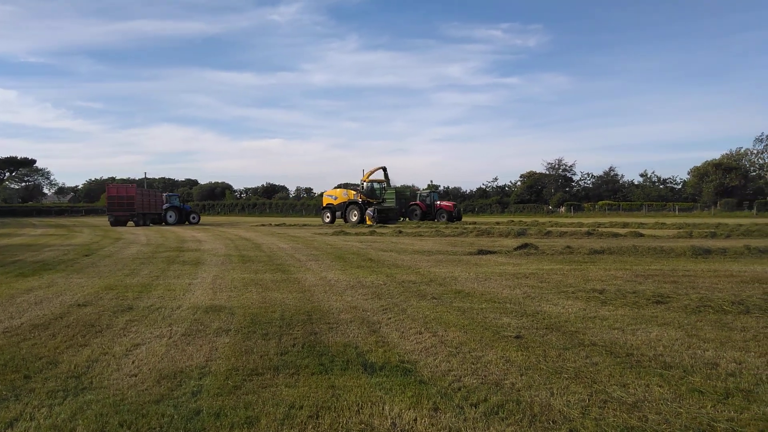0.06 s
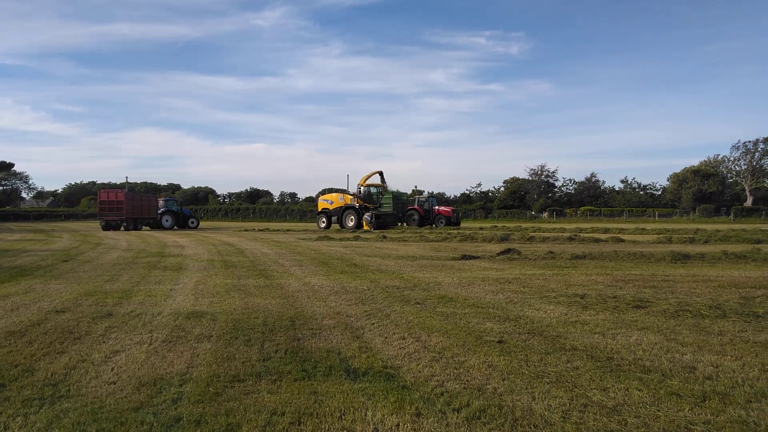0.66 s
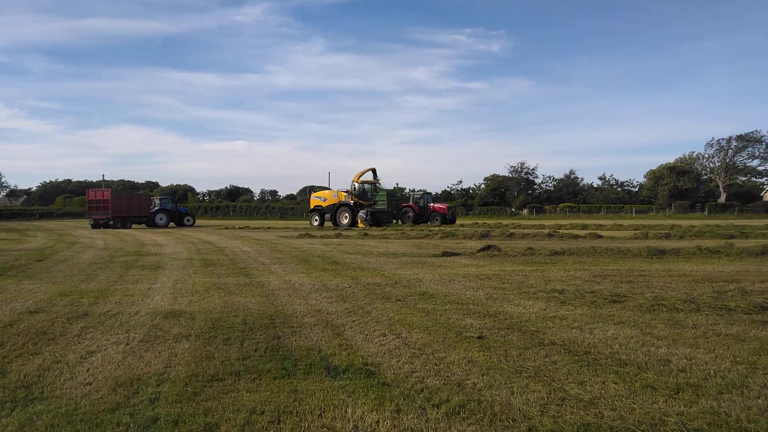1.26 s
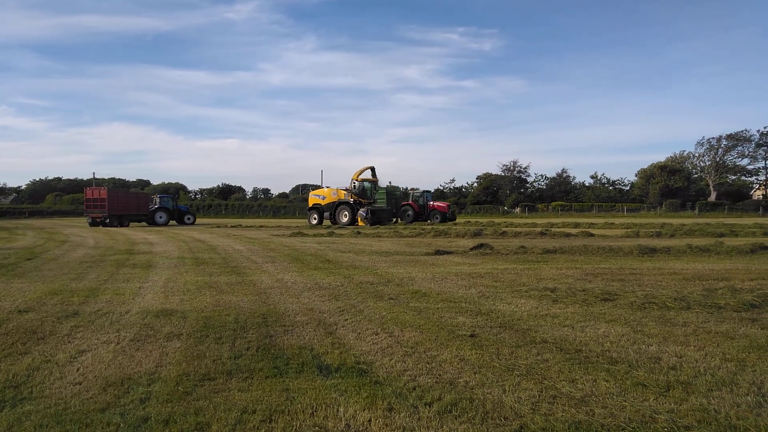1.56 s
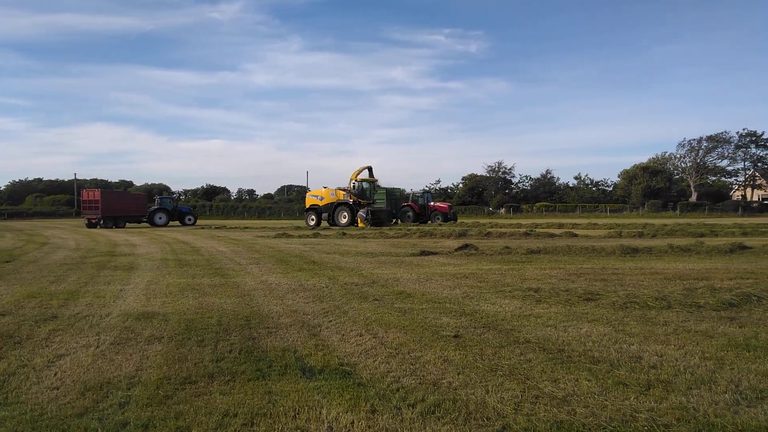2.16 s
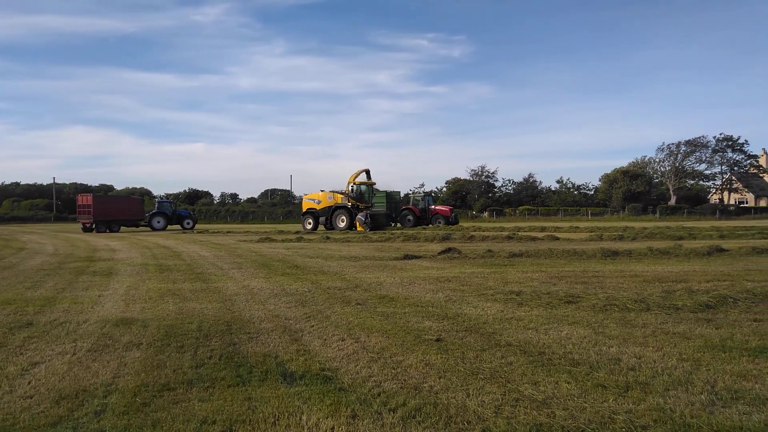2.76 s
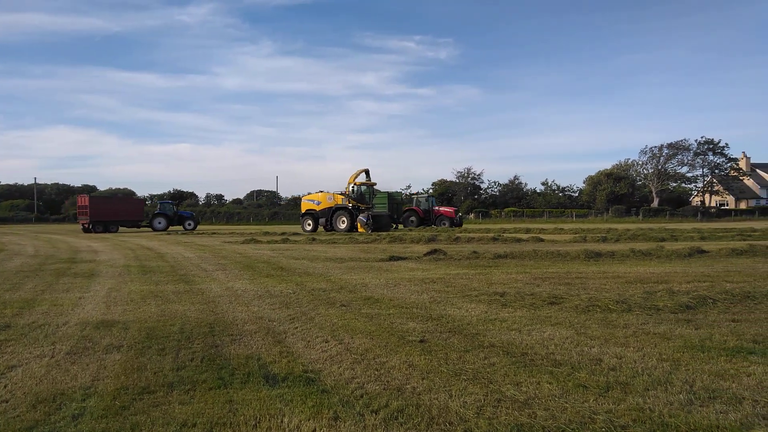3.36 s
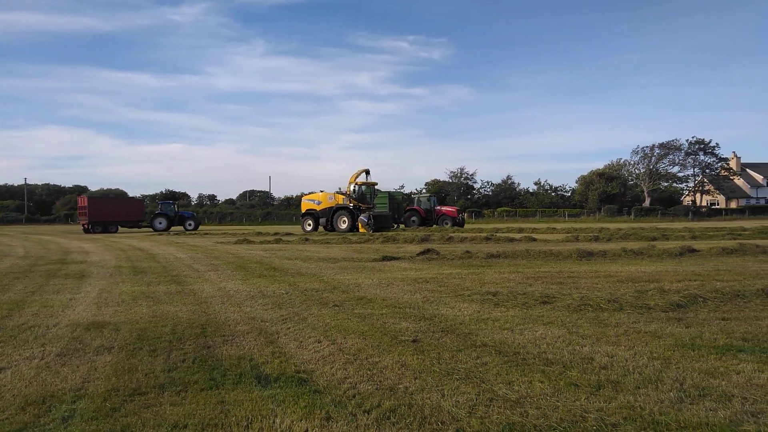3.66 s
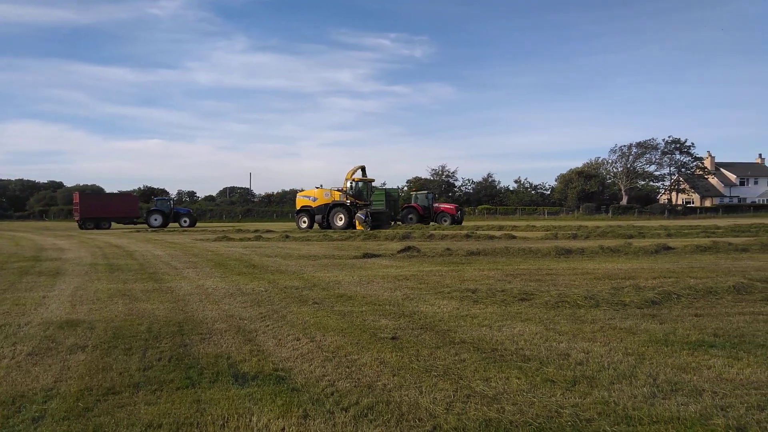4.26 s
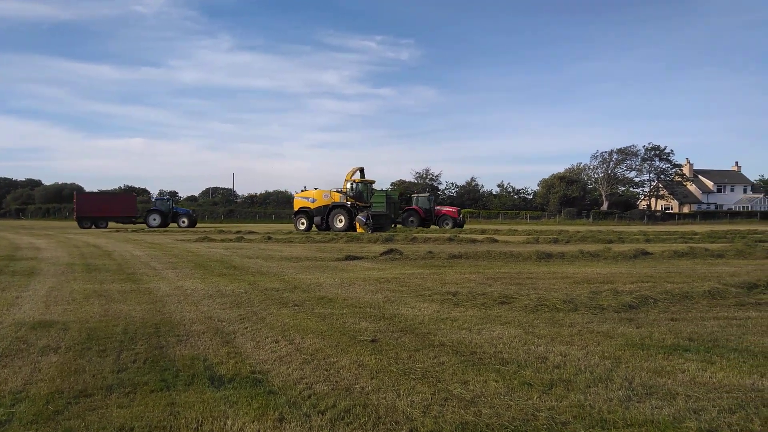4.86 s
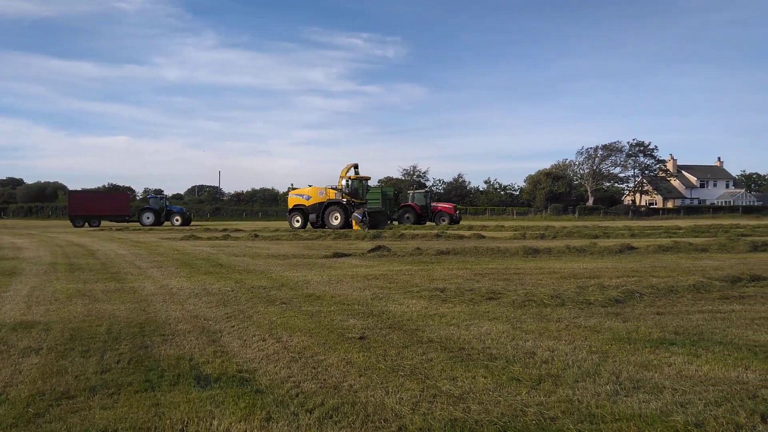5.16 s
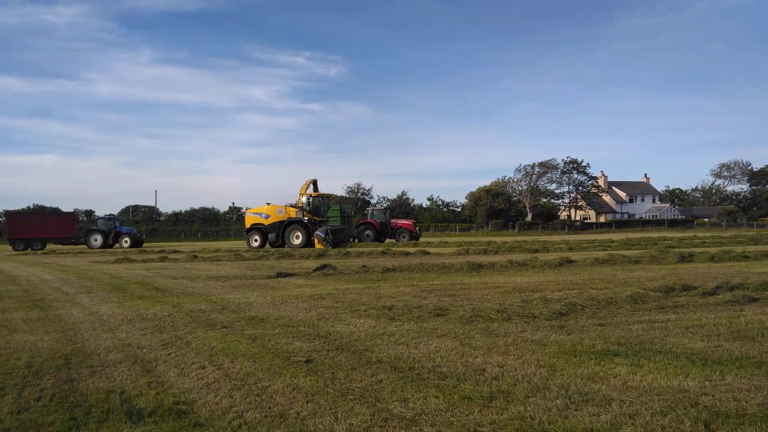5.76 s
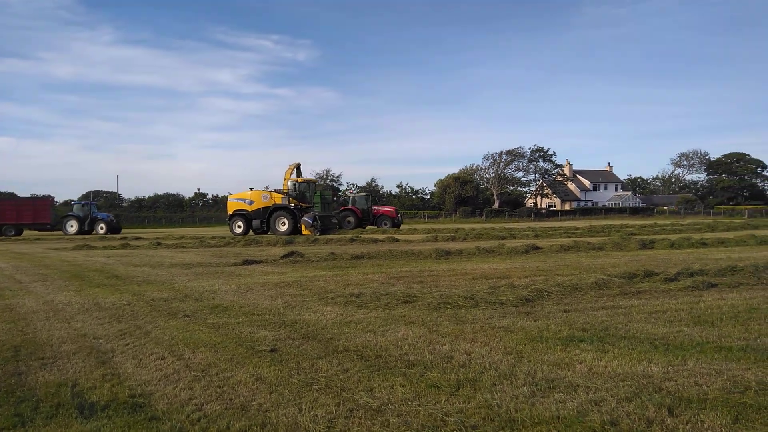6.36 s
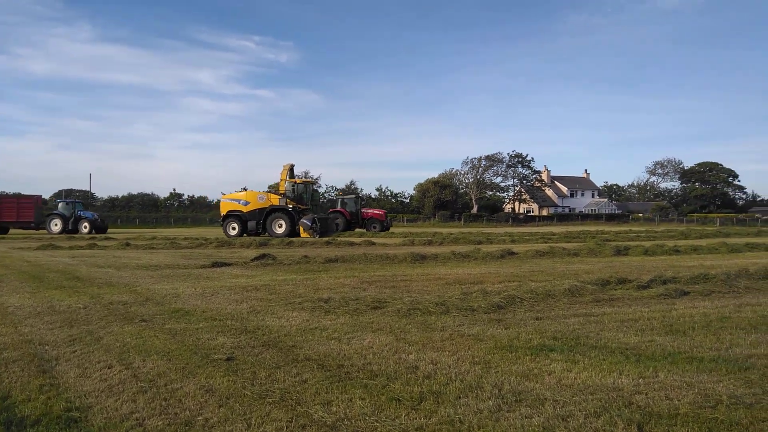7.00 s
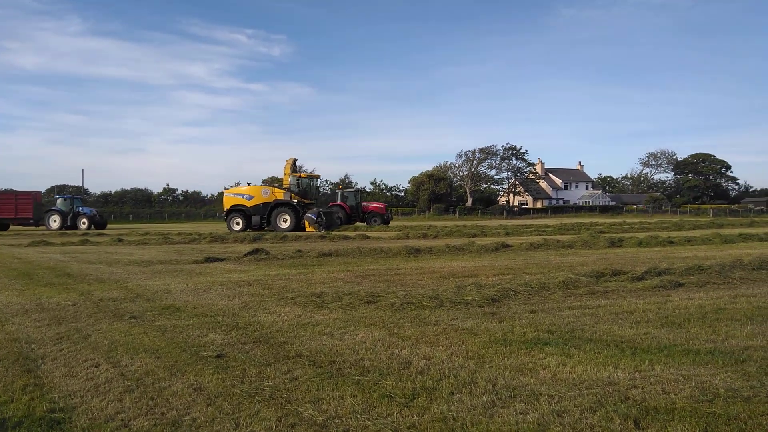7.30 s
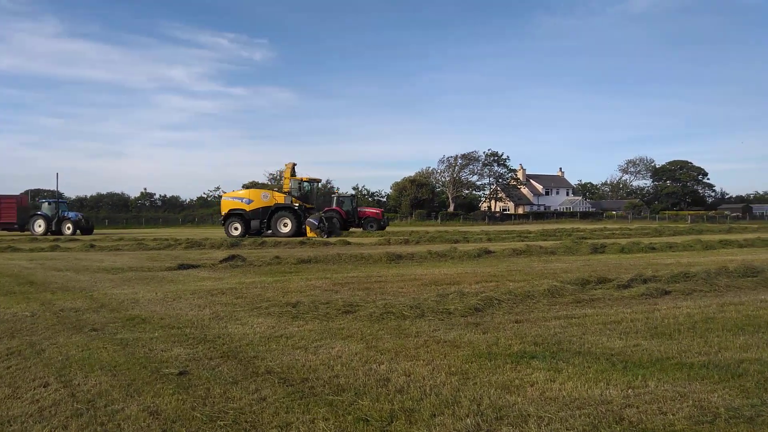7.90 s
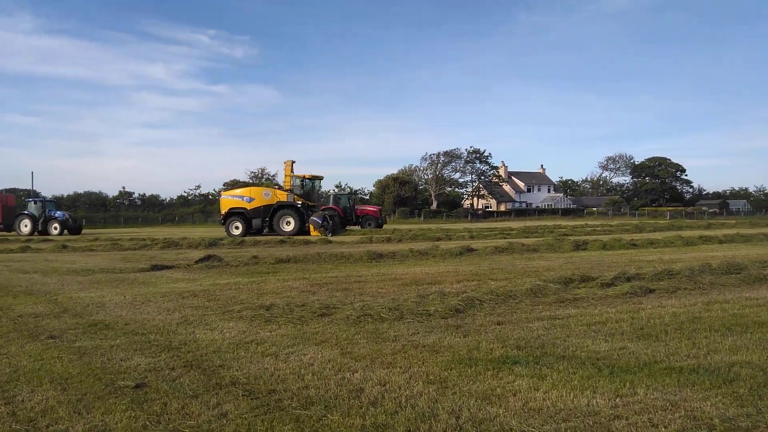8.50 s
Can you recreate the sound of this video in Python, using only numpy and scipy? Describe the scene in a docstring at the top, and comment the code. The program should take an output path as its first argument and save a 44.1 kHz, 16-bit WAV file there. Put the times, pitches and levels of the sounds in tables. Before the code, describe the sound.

Heard from a distance outdoors, a harvester's diesel engine and cutter drum hum continuously beneath a fluttering rush and hiss of chopped grass. The pitch dips briefly with each thick swath, while a thin metallic whine and a faint high whistle waver on top. Two tractor engines add a low drone that builds gently through the first half. Later the stereo image shifts a little as the microphone swings, and the machines carry on.

```python
"""A forage harvester chops grass some sixty metres off across an open field, two tractors alongside.
Its diesel sags under each thick swath; exhaust note, cutter drum and gears are orders of one shaft and
sag together, while the turbocharger whistles. Chopped crop roars and hisses through the spout, and the
tractors drone below. Scattering in turbulent air makes every tone fade and swell. Partway through,
the microphone swings, so that the harvester is heard from one side."""
import sys
import numpy as np
from scipy import signal
from scipy.fft import rfft, irfft
from scipy.io import wavfile

SR = 44100
rng = np.random.default_rng(int(sys.argv[2]) if len(sys.argv) > 2 else 0)


def int16_out(signal):
    """Quantize to a 16-bit WAV file."""
    q = np.round(np.clip(np.atleast_2d(signal).T, -1, 1) * 32767)
    wavfile.write(sys.argv[1], SR, q.astype(np.int16))


N = 381024
TIME, FREQ = np.arange(N) / SR, np.maximum(np.fft.rfftfreq(N, 1 / SR), 1)

# Response of the two microphone ports, with the harvester ahead and to one side:
# (frequency [Hz], left minus right level [dB], coherence [0-1], left phase lag [rad])
PORTS_AHEAD = [(250, 0, 1, 0), (650, .3, .99, .1), (1350, .9, .94, .15), (1650, 1, .65, .4),
               (1950, 0, .9, .1), (2500, 2.5, .8, .25), (2750, 2, .63, .25), (2930, 9, .06, 1.2),
               (3170, 0, .95, 3.14), (3500, .5, .94, 3.1), (3800, -3, .26, 1.7), (4110, -.5, .85, 3),
               (4410, -1, .55, .2), (4590, 0, .64, 2.6), (4750, .6, .7, .8), (5200, -2, .45, 1.7),
               (6650, 2.4, .65, 2.05), (7900, 0, .55, 2.8), (9150, -11, .18, .4), (10300, -2, .7, 2.85),
               (10950, -4.2, .58, 2.85), (12650, 1.5, .8, 3.1), (13700, -1, .1, 3.1)]
PORTS_ASIDE = [(250, 0.0, 1.0, 0.0), (650, 1.0, 0.99, 0.2), (1350, 3.0, 0.91, 0.9), (1700, -2.0, 0.7, 0.6),
               (2050, 1.0, 0.74, 1.4), (2250, -1.5, 0.62, 1.1), (2890, 5.6, 0.54, 1.99),
               (3150, -0.6, 0.998, 3.16), (3400, 0.8, 0.998, 3.12), (3870, -6.9, 0.03, -0.65),
               (4340, -0.3, 0.33, 0.57), (4600, 3.5, 0.55, 2.53), (4950, 0.7, 0.75, 2.62),
               (5260, 0.5, 0.88, 3.73), (6680, 2.0, 0.33, 4.63), (7580, -0.0, 0.78, 6.15),
               (8770, -9.0, 0.0, 5.87), (10170, 0.1, 0.75, 6.32), (10440, -0.8, 0.14, 7.58),
               (11460, -2.8, 0.33, 7.7), (12590, -0.9, 0.84, 9.29), (13260, 0.1, 0.12, 8.92)]


def undb(db):
    """Amplitude ratio of a level in decibels."""
    return np.exp(np.asarray(db) * (np.log(10) / 20))

def curve(table):
    """Linear interpolation in time: each later column of a table at every sample."""
    times, *columns = np.transpose(table)
    return [np.interp(TIME, times, c) for c in columns]

def colour(table):
    """Interpolation in log frequency: each later column of a table at every spectral bin."""
    hz, *columns = np.transpose(table)
    return [np.interp(np.log(FREQ), np.log(hz), c) for c in columns]

def ramp(middle_s, length_s):
    """Linear transition from 0 to 1, centred on middle_s."""
    return np.clip((TIME - middle_s) / length_s + 1 / 2, 0, 1)

def bump(middle_s, width_s):
    """Gaussian pulse of height 1 that falls to 1/e at width_s from its middle."""
    return np.exp(-((TIME - middle_s) / width_s) ** 2)

def noise():
    """Spectrum of white noise with a density of 0 dB per Hz."""
    return rfft(rng.standard_normal(N)) * np.sqrt(SR / 2)

def wander(rate, size=2048):
    """Band-limited random fluctuation of unit variance, changing about rate times a second."""
    hz = np.arange(size // 2 + 1) * SR / N
    slow = irfft(rfft(rng.standard_normal(size)) * hz / (hz + .2 * rate) / (1 + (hz / rate) ** 2))
    return np.interp(np.arange(N), np.linspace(0, N, size), slow / slow.std())

def phase_of(hz):
    """Phase is the time integral of frequency."""
    return 2 * np.pi * np.cumsum(hz) / SR

def tone(phase, scatter, rate):
    """Scattering: turbulent air gives a tone of rms 1 a part of wandering amplitude and phase."""
    phase = phase + 2 * np.pi * rng.random()
    in_phase, quadrature = 1 + scatter * wander(rate), scatter * wander(rate)
    return (in_phase * np.cos(phase) + quadrature * np.sin(phase)) * np.sqrt(2 / (1 + 2 * scatter ** 2))

def ports(table, direct, diffuse=None):
    """Left and right spectra differ in level and phase; diffuse sound lowers their coherence."""
    pan_db, coherence, lag = colour(table)
    pair = np.array([direct, direct])
    if diffuse is not None:
        opposed = np.array([diffuse, -diffuse])
        pair = pair * np.sqrt((1 + coherence) / 2) + opposed * np.sqrt((1 - coherence) / 2)
    balance = undb(np.array([pan_db, -pan_db]) / 2)
    balance /= np.sqrt(np.mean(balance ** 2, axis=0))
    return pair * balance * np.array([np.exp(-1j * lag), np.ones(len(lag))])

def microphone_swing():
    """Direction of incidence: 0 with the harvester ahead, 1 with it to one side."""
    return ramp(middle_s=5.4, length_s=.26)

def tractors():
    """Spherical spreading: two diesels of wandering speed grow louder as they draw closer."""
    # engine tones: (frequency [Hz], relative level [dB])
    partials = [(105, -46), (121, -38.5), (136, -27.5), (143, -36), (243, -41.5)]
    # exhaust grumble and midrange growl: (frequency [Hz], relative spectral density [dB])
    grumble_spectrum = [(40, -90), (75, -56.5), (100, -55.5), (135, -48), (165, -50.5), (200, -59.5),
                        (290, -60.5), (350, -74), (500, -130)]
    growl_spectrum = [(280, -100), (400, -76.5), (560, -66), (680, -63), (790, -67), (1000, -75),
                      (1400, -100)]
    drift = 1 + .01147 * wander(.578)
    drone = sum(undb(db - 5.5) * tone(phase_of(hz * drift), scatter=.65, rate=4.8) for hz, db in partials)
    grumble = irfft(noise() * undb(colour(grumble_spectrum)[0]))
    growl = irfft(noise() * undb(colour(growl_spectrum)[0]))
    growl *= ramp(middle_s=3.4, length_s=.33) * undb(1.5 * wander(4.9))  # enters as they draw level
    approach_db = np.interp(TIME, [0, 4.9], [-5.5, 1])
    return undb(approach_db) * (drone + grumble + growl)

def rumble(fade_db_per_s=.3):
    """Directivity: the noise of tyres, feed rollers and exhaust gas fades as the rear turns away."""
    # the harvester's low noise: (frequency [Hz], spectral density [dB per Hz])
    spectrum = [(15, -71), (30, -72), (50, -68), (70, -59), (95, -58.5), (130, -56.5), (165, -51),
                (195, -56), (255, -57), (305, -59), (340, -69), (400, -90), (600, -127)]
    fade_db = fade_db_per_s * (TIME - TIME.mean())
    return irfft(noise() * undb(colour(spectrum)[0])) * undb(.57 * wander(4.5) - fade_db)

def crop_stream(firing, bands=9, hiss_from_hz=3500):
    """Flow noise: the blower roars and grass hisses up the spout; moving air flutters each band."""
    # rush of the crop: (frequency [Hz], relative spectral density ahead [dB], the same aside [dB])
    rush_spectra = [(400, -75, -67), (530, -65.5, -61.5), (700, -60, -58), (825, -64, -63.5),
                    (940, -64, -63.5), (1150, -60.5, -58.5), (1390, -59.5, -58), (1600, -64, -62),
                    (1860, -58.5, -57.5), (2000, -60.5, -57), (2120, -62.5, -59), (2380, -60.5, -58.5),
                    (2590, -63.9, -61.5), (2980, -68.5, -65.3), (3250, -72.5, -75.5), (3390, -72, -75.5),
                    (3830, -66, -67.5), (4070, -72.5, -66.5), (4800, -67, -64.5), (4760, -63.5, -62.5),
                    (6130, -57, -55.5), (6750, -60, -56.5), (7660, -62.5, -57.5), (8100, -62.5, -60),
                    (8700, -63, -66.5), (9470, -61, -63), (10400, -65.5, -66), (11300, -63.5, -64.5),
                    (12320, -70.5, -64), (13600, -80.5, -83)]
    # hiss following the flow of grass: (time [s], relative level [dB])
    flow_level = [(0, 0.2), (.5, 0), (1, -2), (1.25, -2.4), (1.65, -1.4), (2.25, -1.3), (2.5, -0.5),
                  (2.95, -0.5), (3.4, -1.4), (3.75, -0.7), (4.4, 1), (4.9, 0.2), (5.25, -0.9), (5.55, -2.4),
                  (6.4, .5), (7.5, -0.25), (8.64, .2)]
    centres_hz = np.geomspace(400, 4500, bands)
    band_position = np.interp(np.log(FREQ), np.log(centres_hz), np.arange(bands))
    low_cut = 1 / np.sqrt(1 + (370 / FREQ) ** 12)
    throb = 1 + .04 * np.cos(firing)
    roar = undb(-.7 + 1.1 * bump(5.75, 1.7)) * throb  # swells as the spout points at the listener
    hiss = undb(curve(flow_level)[0])
    flutter = [undb(wander(9.2) + 1.6 * wander(17)) for _ in centres_hz[:-1]]
    flutter.append(undb(.28 * wander(8)))  # the top band wavers only slightly
    swing = microphone_swing()
    out = 0
    for table, rush_db, share in zip((PORTS_AHEAD, PORTS_ASIDE), colour(rush_spectra), (1 - swing, swing)):
        pair = ports(table, noise(), noise()) * undb(rush_db) * low_cut
        for k, hz in enumerate(centres_hz):
            gain = roar if hz < hiss_from_hz else hiss
            band = irfft(pair * np.maximum(1 - abs(band_position - k), 0))
            out = out + band * (flutter[k] * gain * np.sqrt(share))
    return out

def sheen(stream, above_hz=10500):
    """Amplitude modulation: the highest hiss wavers, dulls early on and brightens briefly near 5.5 s."""
    # treble shelf: (time [s], gain [dB])
    shelf = [(0, -1.2), (.55, .8), (1.15, -4), (1.9, -5), (2.3, -1.1), (3.6, .2), (4.5, 1.3), (5.2, -0.5),
             (5.48, 6.5), (6.5, 1.3), (7.2, -1.5), (8.64, 0)]
    treble = irfft(rfft(stream) / (1 + (above_hz / FREQ) ** 16))
    gain = undb(curve(shelf)[0] + .7 * wander(8))
    return stream + (gain - 1) * treble

def gears(firing, mesh_order=14.75, left_lag_rad=.42):
    """Tooth meshing: the drive radiates a thin metallic whine that beams out in short squeals."""
    # whine beneath the squeals: (time [s], level [dB])
    whine_level = [(0, -48), (1.8, -44), (3.05, -46), (3.3, -39.5), (3.65, -40), (4.35, -38.5), (4.55, -44),
                   (5.1, -40), (5.5, -44), (6.9, -39.5), (7.6, -46), (8.64, -38.5)]
    # squeals: (time [s], rise [dB], half-width [s])
    squeals = [(.67, 9.5, .17), (3.33, 8.5, .1), (3.47, 6, .04), (3.84, 4, .11), (4.38, 6, .06),
               (5.16, 4.5, .09), (6.2, 6, .07), (8.25, 9, .05)]
    db = curve(whine_level)[0] + sum(rise_db * bump(s, width_s) for s, rise_db, width_s in squeals)
    whine = undb(db) * tone(mesh_order * firing, scatter=.21, rate=8.3)
    left = irfft(rfft(whine) * np.exp(-1j * left_lag_rad))
    return np.array([left, whine])

def turbo():
    """Spectral broadening: the air blurs the whistle of a turbine that spools with the load."""
    # turbocharger whistle: (time [s], frequency [Hz])
    pitch = [(0, 11320), (.4, 11250), (1.15, 10430), (3.15, 10890), (3.6, 10400), (5, 11300), (5.75, 11400),
             (6, 11285), (8.64, 11285)]
    return undb(-37) * tone(phase_of(curve(pitch)[0]), scatter=1.1, rate=17)

def exhaust(firing):
    """Periodic gas flow sounds at the firing rate; uneven cylinders add a thud once a turn."""
    # note before the surges, fading as the pipe turns away: (time [s], level [dB])
    note_level = [(0, -17.9), (1.9, -19.3), (2.5, -20.9), (3.0, -23.7), (3.45, -21.4), (4.0, -21),
                  (4.5, -18.5), (4.85, -22.2), (5.2, -25.5), (6.35, -26.3), (6.8, -34), (7.3, -30.5),
                  (8, -27.7), (8.64, -27)]
    # surges and drops caused by moving air: (time [s], level change [dB])
    surges = [(.32, -4), (.42, 4), (.58, -2), (.78, 3), (.88, -3), (1.06, -2), (1.2, 4), (1.43, -4),
              (1.69, 4), (1.88, 2.5), (1.99, -3), (2.55, 3.5), (2.7, -8), (3.16, -12), (3.58, 5),
              (3.73, -5), (3.85, 4), (3.98, -6), (4.25, 2.5), (4.55, 3), (5.1, 3.5), (5.35, -10),
              (5.86, 7.5), (6.08, -7), (6.24, 8.5), (6.55, -12), (7.15, 5), (7.37, 5), (8, 6), (8.23, -12)]
    surge_db = sum(db * bump(s, width_s=.068) for s, db in surges)
    note = undb(surge_db) * tone(firing, scatter=.13, rate=5.5)
    thud = undb(-22 + surge_db / 2) * tone(firing / 3, scatter=.3, rate=7.9)
    return undb(curve(note_level)[0]) * (note + thud)

def cutter_drum(firing):
    """Blade passage: the knives beat seven times for every five firings."""
    # knife beat: (time [s], level [dB])
    beat_level = [(0, -33.5), (1.1, -40), (1.4, -33), (1.7, -38), (2.2, -31.5), (3, -32), (3.38, -41),
                  (3.6, -30.5), (3.95, -29.5), (4.6, -32), (5.05, -37.5), (5.45, -29.5), (5.75, -39),
                  (6.2, -37), (7.3, -29.5), (8.25, -28), (8.64, -30)]
    return undb(curve(beat_level)[0]) * tone(7 / 5 * firing, scatter=.22, rate=4)

def engine_orders(firing):
    """Order tones: everything driven by the crankshaft sounds at a fixed multiple of the firing rate."""
    # the exhaust's octave and the engine housing's boom: (time [s], level [dB])
    octave_level = [(0, -33.5), (.4, -29.5), (.58, -37), (.8, -32), (1.03, -37), (1.2, -26), (1.45, -41),
                    (1.62, -32), (1.9, -30), (2.25, -42), (3.2, -42), (3.45, -33), (3.7, -29), (3.9, -35.5),
                    (4.25, -29.5), (4.6, -23.8), (4.85, -30), (5.2, -37), (5.42, -33), (5.62, -37),
                    (5.78, -28.5), (6.1, -30), (6.38, -26.5), (6.5, -33), (6.7, -26), (6.88, -33),
                    (7.35, -30.5), (7.8, -37), (8.64, -35.5)]
    housing_level = [(0, -43), (.37, -38.5), (.65, -46), (1.5, -46), (2.6, -45), (2.9, -39), (3.2, -48),
                     (3.55, -34.5), (3.95, -38), (4.38, -33.5), (4.55, -39), (4.85, -39), (5.02, -30.5),
                     (5.25, -36), (5.47, -31.5), (5.7, -38), (5.95, -29.5), (6.15, -35), (6.38, -30.7),
                     (6.52, -43), (7.05, -42), (7.23, -30.5), (7.4, -38), (7.62, -35), (8.0, -42),
                     (8.3, -37), (8.5, -29), (8.64, -32)]
    # exhaust buzz and two knife-beat overtones, as the cutter end comes round to face the listener:
    # (order [x firing rate], first level [dB], last level [dB], scatter [ratio], flutter rate [1/s])
    shaft_tones = [ (3, -45.5, -50, 0.7, 7.5), (14 / 5, -64, -42.5, 0.29, 2.4),
                   (21 / 5, -48, -44.5, 0.61, 2.4)]
    # fractional-order and knocking tones: (order [x firing rate], first level [dB], last level [dB])
    knock_tones = [(2 / 3, -43, -43), (7 / 10, -39, -39), (5 / 3, -45, -45), (5, -45, -44), (6, -48.5, -45),
                   (7.04, -40, -45), (8, -44, -42), (8.45, -42.5, -45.5), (11, -49, -47), (12, -46, -43),
                   (13, -44, -41.5)]
    # two harmonics that swell in turn as the machine moves past:
    # (order [x firing rate], base level [dB], rise [dB], peak time [s], half-width [s])
    whine_tones = [(9, -43.5, 6.5, 1.9, 1.1), (10, -47, 10.5, 6.2, .65)]
    octave = undb(curve(octave_level)[0]) * tone(2 * firing, scatter=.21, rate=7.3)
    housing = undb(curve(housing_level)[0]) * tone(4 * firing, scatter=.24, rate=8)
    shaft = sum(undb(np.linspace(first_db, last_db, N)) * tone(k * firing, scatter, rate)
                for k, first_db, last_db, scatter, rate in shaft_tones)
    knock = sum(undb(np.linspace(first_db, last_db, N)) * tone(k * firing, scatter=.42, rate=4)
                for k, first_db, last_db in knock_tones)
    whines = sum(undb(db + rise_db * bump(s, width_s)) * tone(k * firing, scatter=.3, rate=4)
                 for k, db, rise_db, s, width_s in whine_tones)
    return octave + housing + shaft + knock + whines

def harvester(firing):
    """Directional hearing: the machine's tones reach the two ports from ahead, then from one side."""
    spectrum = rfft(exhaust(firing) + cutter_drum(firing) + engine_orders(firing) + turbo())
    swing = microphone_swing()
    return (1 - swing) * irfft(ports(PORTS_AHEAD, spectrum)) + swing * irfft(ports(PORTS_ASIDE, spectrum))

def scene():
    """Superposition of the harvester's tones, gears, crop stream and rumble with the tractors."""
    # the diesel, sagging under each thick swath: (time [s], firing rate [Hz])
    firing_rate = [(0, 151.3), (.75, 152.6), (1.08, 151.2), (1.3, 148.3), (1.72, 151.6), (2.04, 149.2),
                   (3.08, 148.6), (3.38, 153), (3.78, 146.5), (4.24, 149.9), (4.69, 143.6), (5.02, 150.3),
                   (5.55, 150.2), (5.76, 152.1), (6.02, 149.7), (6.22, 150.4), (6.38, 149.2), (6.6, 150.7),
                   (7.04, 151.4), (7.48, 149.2), (8.0, 149.7), (8.28, 151.5), (8.64, 150.9)]
    firing = phase_of(curve(firing_rate)[0])
    return harvester(firing) + gears(firing) + sheen(crop_stream(firing)) + rumble() + tractors()

def record(dry):
    """Band limiting: a steep elliptic low-pass removes the treble above 15.7 kHz."""
    return signal.sosfilt(signal.ellip(14, .1, 80, 15700, fs=SR, output="sos"), dry)


dry = scene()
out = record(dry)
int16_out(out)
```